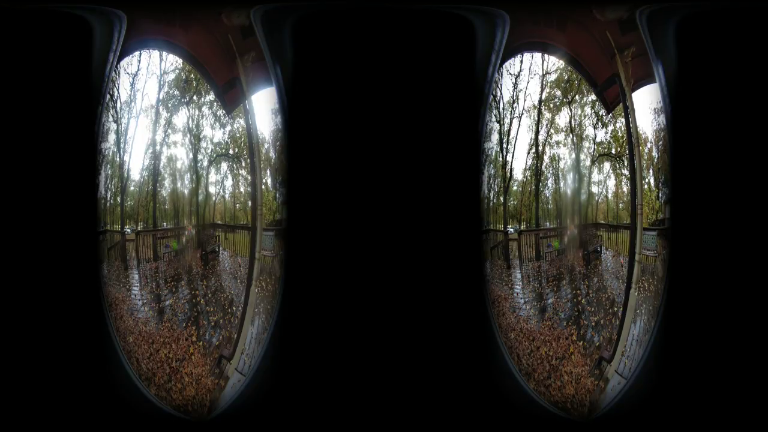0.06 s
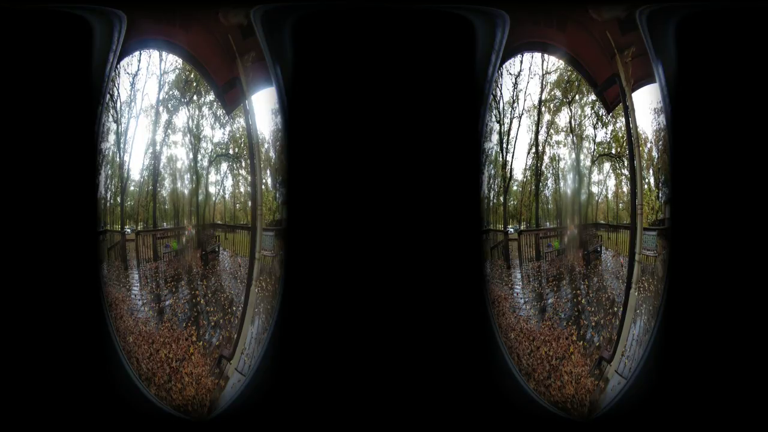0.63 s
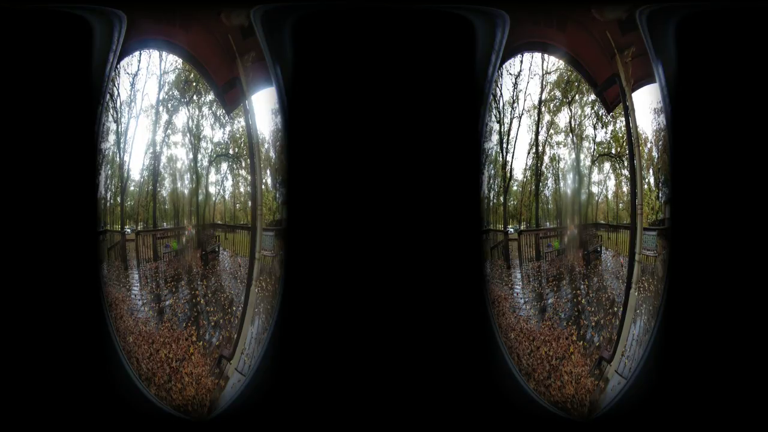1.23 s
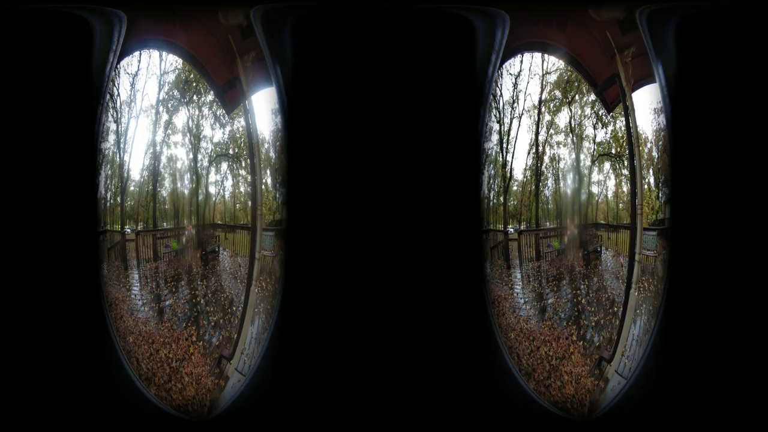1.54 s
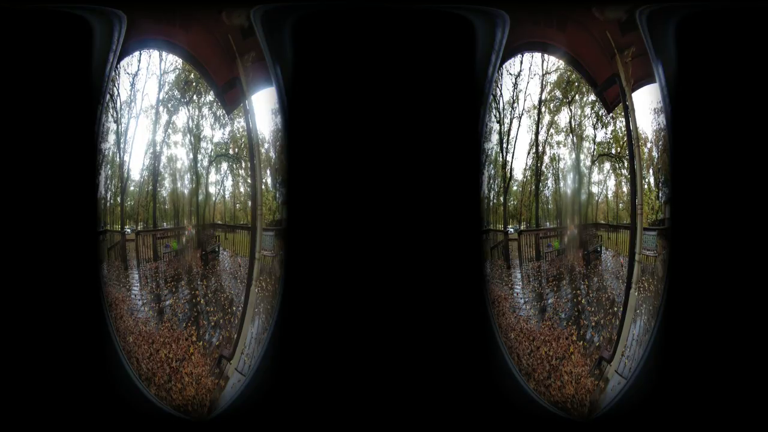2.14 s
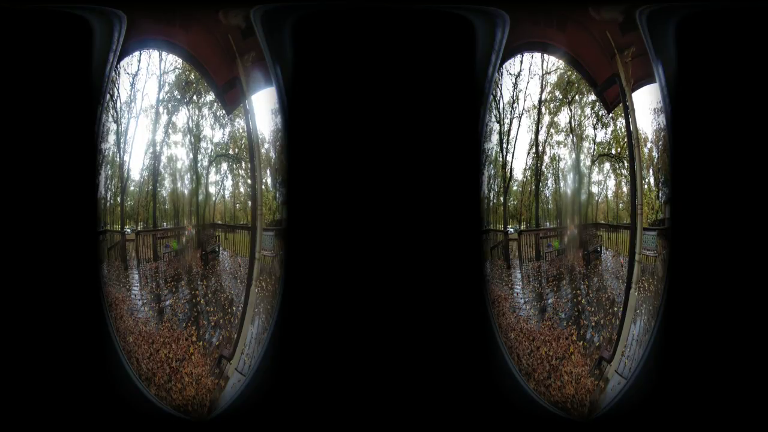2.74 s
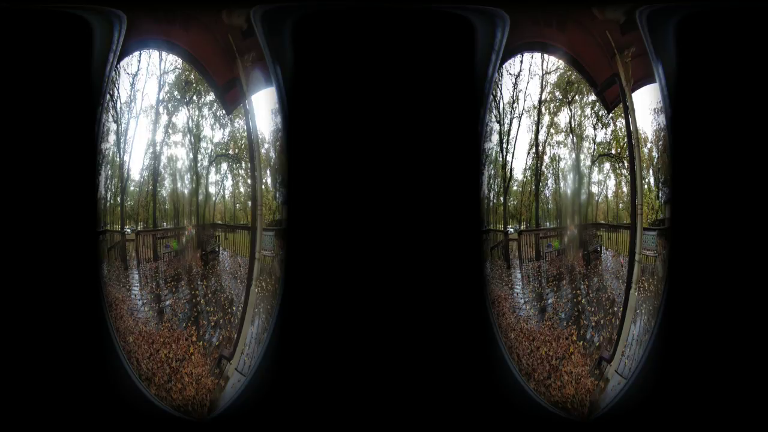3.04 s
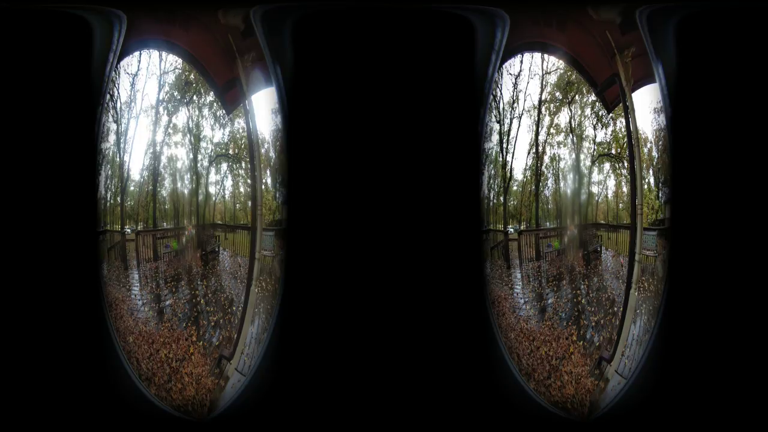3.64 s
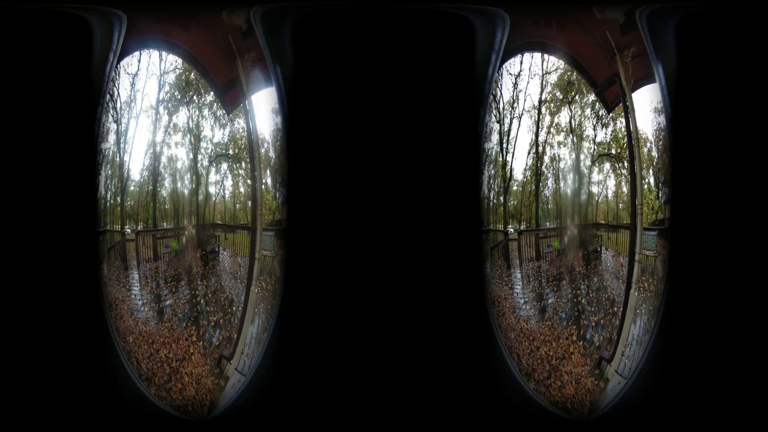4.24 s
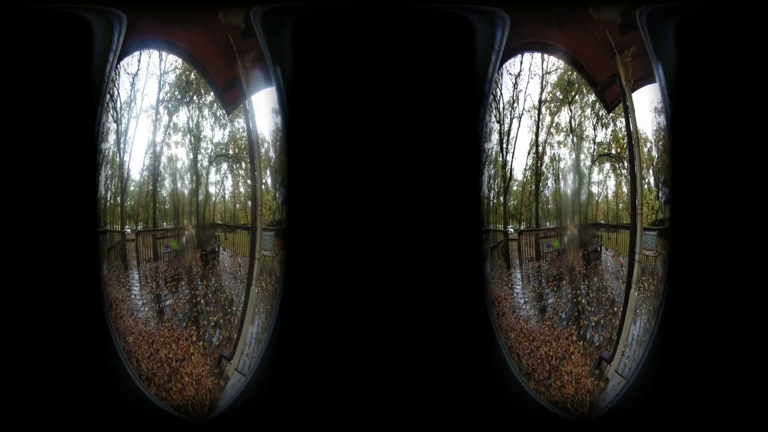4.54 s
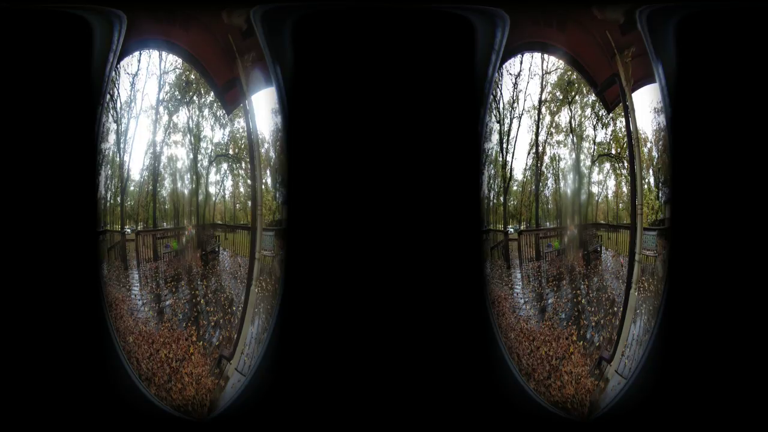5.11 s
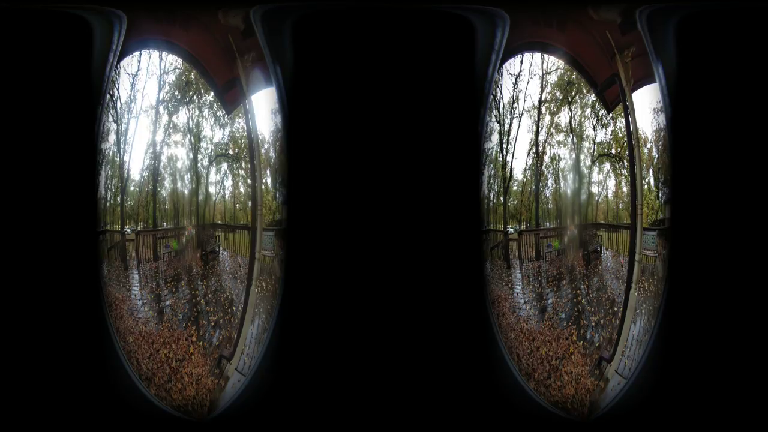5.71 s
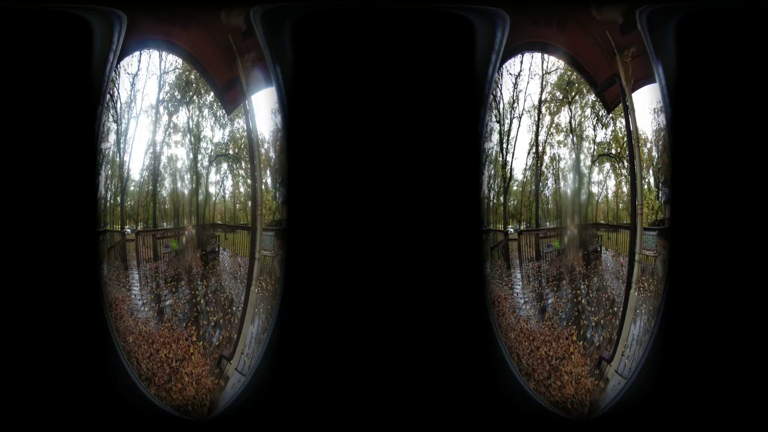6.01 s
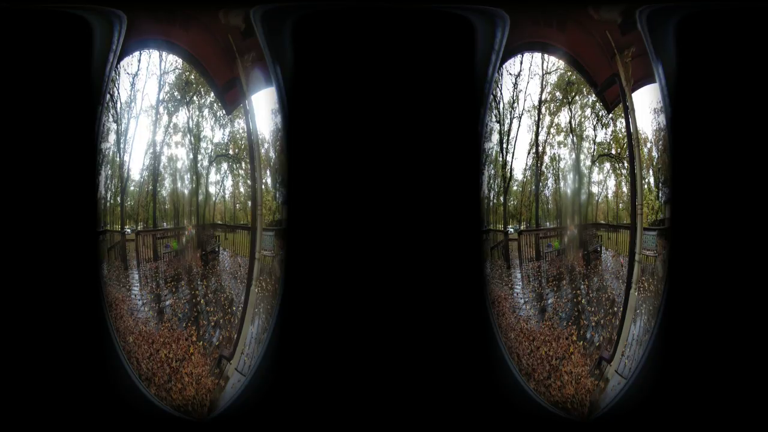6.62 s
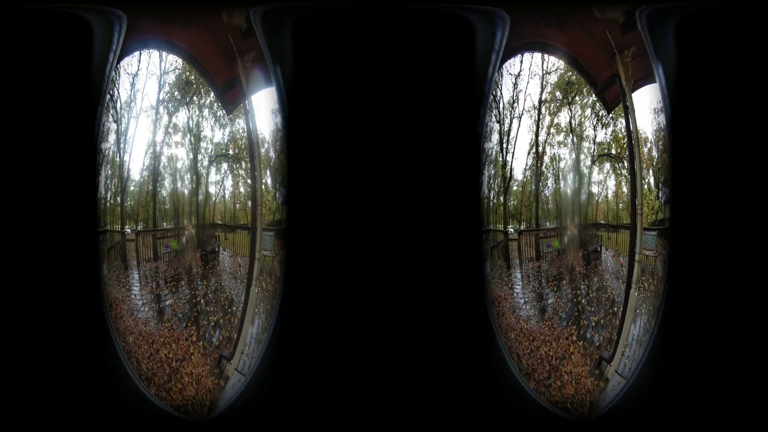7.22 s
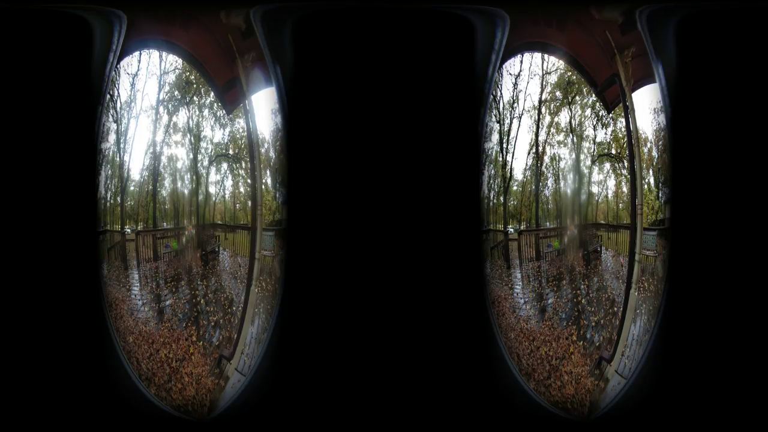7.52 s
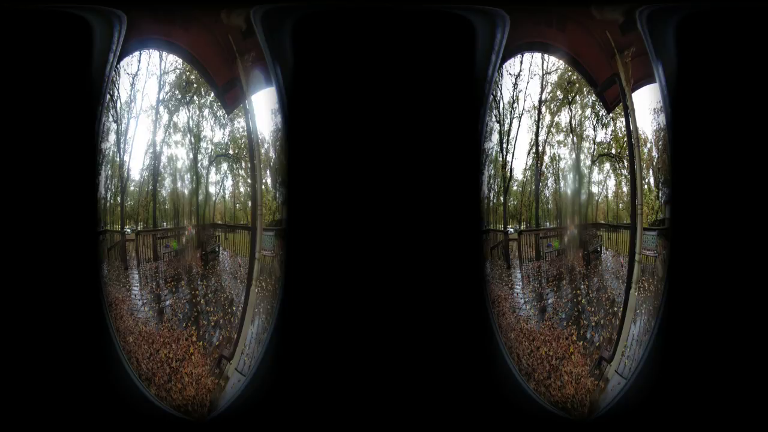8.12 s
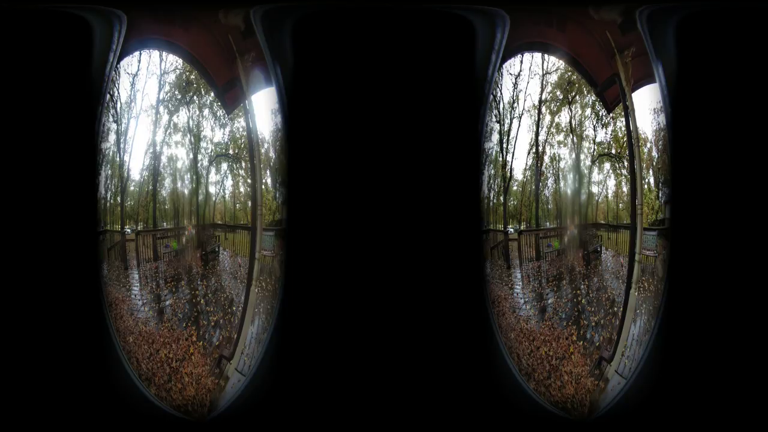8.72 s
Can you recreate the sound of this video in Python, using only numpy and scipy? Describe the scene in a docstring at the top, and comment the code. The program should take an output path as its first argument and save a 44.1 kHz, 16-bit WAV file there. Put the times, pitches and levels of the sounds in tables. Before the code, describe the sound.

Rain patters on leaves and splats on a porch deck, with wind buffeting the microphone and drops knocking on a metal roof, then fading.

```python
"""Rain in front of a porch. From the start it hisses and patters on wet leaves, gusts buffet the two
microphone ports in turn, bubbles plop in puddles and fat drops from the eaves splat on the deck.
From 1.2 s drops ring the sheet roof overhead; near 5.6 s a run of water drums on it.
Soft splashes enter at 6 s. From 7 s the rain and wind sink away, leaving a few faint splashes."""
import sys
import numpy as np
from scipy import signal
from scipy.fft import rfft, irfft, next_fast_len
from scipy.io import wavfile
from scipy.ndimage import uniform_filter1d, map_coordinates

SR = 44100
rng = np.random.default_rng(int(sys.argv[2]) if len(sys.argv) > 2 else 0)


def digitize_waveform(pressure):
    """Quantize a signal to 16-bit integers and store it at the path in sys.argv[1].

    Rows of a 2-D input are taken as channels; values are limited to [-1, 1].
    """
    field = np.atleast_2d(pressure).T
    bounded = np.clip(field, -1, 1)
    quanta = np.round(bounded * 32767).astype(np.int16)
    wavfile.write(sys.argv[1], SR, quanta)


N = 386316

# breeze between gusts: time_s, level_db
BREEZE = [(0.0, -44.5), (0.75, -40.5), (1.08, -51), (1.35, -41), (1.92, -54.5), (2.25, -38), (2.5, -54.5),
          (2.72, -43.5), (3.25, -40.5), (3.75, -53.5), (4.9, -53), (5.5, -62.5), (6.0, -63.5), (6.8, -62),
          (7.25, -74.5), (7.9, -76.5), (8.75, -79.5)]
# weak wind at a port: freq_hz, density_db
RUMBLE_SPECTRUM = [(20, -37), (36, -43), (60, -9), (90, 3.5), (125, -1), (175, -19), (260, -56.5),
                   (450, -97)]
# strong wind at a port: freq_hz, density_db
BUFFET_SPECTRUM = [(40, -40.5), (90, -7), (150, 6.5), (250, 1.5), (400, -9.5), (600, -24), (1000, -46),
                   (2500, -71)]
# shower strength: time_s, hiss_db, patter_db
SHOWER = [(0.0, -51.5, -62), (0.4, -49, -53.5), (1.25, -50.5, -55), (1.42, -49, -67), (1.7, -50, -68),
          (1.85, -50.5, -50.5), (2.3, -49, -63), (2.5, -48, -45.5), (3.0, -48.5, -49), (3.55, -48.5, -52),
          (3.93, -50.5, -57), (4.1, -48, -50), (4.5, -49, -60), (4.72, -48, -48.5), (5.45, -48, -45),
          (5.74, -56.5, -70), (6.1, -53, -61), (6.3, -48.5, -58), (6.85, -50, -53.5), (7.08, -58, -88),
          (7.48, -52, -77), (7.63, -58, -61), (7.71, -87.5, -100), (8.76, -99, -102)]
# far rain: freq_hz, density_db
HISS_SPECTRUM = [(500, -56), (1000, -13.5), (1450, 0), (2200, 1), (3300, 0.5), (5000, -1.5), (8000, -4.5),
                 (12500, -3), (16000, -4)]
# rain on leaves: freq_hz, density_db
PATTER_SPECTRUM = [(250, -37), (450, -18), (750, -17.5), (1100, -1), (1600, -2), (2300, -6.5), (3500, -5),
                   (7000, -27.5)]
# water spray: freq_hz, density_db
SPRAY_SPECTRUM = [(400, -49.5), (1000, -10.5), (2500, 0), (6000, 1.5), (9000, 1.5), (13000, 6), (16000, 1)]
# left-right likeness of sound from all round: freq_hz, coherence
COHERENCE = [(300, 0.88), (1400, 0.57), (3000, 0.032), (6000, 0.024)]
# still background: freq_hz, density_db
HUSH_SPECTRUM = [(100, -3), (400, -6), (1000, -11), (4000, -19.5), (16000, -25.5)]
# gusts: peak_s, level_db, left_minus_right_db, width_s, pitch_hz
GUSTS = [(0.013, -36, -14, 0.0042, 134), (0.135, -34.5, -7, 0.0048, 138.8),
         (0.325, -21.5, -20.5, 0.012, 215.6), (0.354, -21.5, -16.5, 0.019, 162),
         (0.439, -30.5, -3.5, 0.018, 171), (0.48, -30, -2, 0.011, 172.3), (0.543, -21, -12, 0.0041, 192),
         (0.585, -22, -19, 0.024, 176.6), (0.642, -24.5, -12, 0.016, 207), (0.707, -34.5, 16, 0.02, 176),
         (0.791, -32, -12, 0.012, 128), (1.138, -41.5, 9, 0.0066, 119), (1.253, -28.5, 13, 0.004, 154),
         (1.417, -33, 3, 0.015, 131), (1.478, -41.5, -1, 0.059, 140), (1.871, -41.5, 9, 0.0033, 135),
         (2.045, -27, 1, 0.012, 123), (2.071, -29, -10, 0.017, 120), (2.12, -29.5, 18, 0.0068, 142),
         (2.184, -27.5, 17, 0.0097, 155), (2.717, -34, 9.5, 0.039, 110), (2.871, -27.5, -10, 0.0047, 150),
         (2.881, -27, 7, 0.011, 180), (2.934, -26, 19, 0.023, 146), (3.022, -43.5, 2, 0.014, 151),
         (3.126, -35, -3.5, 0.012, 131), (3.379, -24.5, 13, .012, 146), (3.406, -22.5, 18, 0.011, 148),
         (4.331, -44, 2.5, 0.08, 69.6), (5.808, -46.5, 5, 0.041, 80.5), (6.163, -50.5, 3.5, 0.047, 71),
         (6.528, -46.5, 10.5, 0.015, 87.4), (6.661, -42, 6.5, 0.029, 134), (6.847, -53.5, -3, 0.019, 79.2),
         (7.449, -58, -2, 0.044, 74)]
# swirls of a gust: pitch_ratio, density_db
SWIRL_SPECTRUM = [(.25, -45.5), (.58, 2.5), (1, 1.5), (1.5, -4.5), (2.4, -13.5), (3.6, -26.5), (5, -47.5),
                  (8, -61.5)]
# bubbles in puddles: start_s, peak_db, pitch_hz
PLOPS = [(0.02, -49, 554), (0.825, -53.5, 678), (0.945, -56, 996), (0.975, -47, 582), (1.615, -50.5, 627),
         (1.89, -52, 713), (1.93, -56, 928), (2.38, -53, 425), (2.77, -48.5, 1200), (3.075, -52, 710),
         (3.975, -53, 525), (4.012, -52.5, 438), (4.63, -46, 333), (5.08, -50, 677), (5.83, -54.5, 920),
         (6.305, -55.5, 702), (7.16, -57, 753)]
# fat drops on the deck: start_s, level_db, pitch_hz, spray_db
DECK_DROPS = [(0.2003, -32, 7990, 1), (0.3818, -17.5, 3230, -33), (0.4409, -29.5, 3500, -19),
              (0.4743, -29.5, 4000, -22), (0.8129, -25, 1530, -21), (1.9819, -35.5, 2510, -5.5),
              (2.1086, -41, 5000, -3), (2.4287, -22, 1470, -28), (2.4568, -26.5, 3500, -17),
              (2.7943, -29, 1167, -5), (3.048, -23.5, 1690, -10.5), (3.2011, -39, 5000, -0.5),
              (3.3106, -22, 1120, -23.5), (3.455, -24, 1270, -15.5), (3.556, -28.5, 6300, -8.5),
              (3.8664, -18.5, 3000, -24), (4.069, -22, 2150, -19), (4.1604, -21.5, 1390, -12.5),
              (4.1849, -33.5, 2000, -3), (4.603, -18.5, 2950, -31), (4.697, -18, 1600, -27),
              (4.828, -38, 1390, 1), (4.8696, -40, 6000, 4), (4.904, -26.5, 3000, -14),
              (4.9139, -28, 1990, -5.5), (4.987, -19.5, 1610, -18), (4.996, -15, 1170, -18),
              (5.0443, -22, 2940, -18), (5.0834, -21.5, 3180, -11.5), (5.09, -20.5, 2500, -30),
              (5.1354, -23, 1250, -32), (5.1664, -24, 2400, -8.5), (5.2115, -29.5, 1850, -1),
              (5.2162, -19, 1850, -14.5), (5.357, -25.5, 3070, -16), (5.407, -28, 3740, -11),
              (5.4454, -20, 2430, -21), (5.4586, -23.5, 3900, -11), (5.5356, -26.5, 2670, -21),
              (5.9298, -27.5, 960, -13), (6.121, -31, 1556, -12), (6.2337, -23, 2030, -17.5),
              (6.2698, -16.5, 3440, -20), (6.3605, -24.5, 1790, -16), (6.4086, -18.5, 1920, -25),
              (6.569, -30, 2200, -12), (6.5788, -18.5, 1720, -19), (6.6087, -20, 2460, -18.5),
              (6.6205, -13, 5830, -21), (6.636, -20, 3240, -18), (6.7086, -26, 1450, -14),
              (6.7558, -31.5, 2980, -7.5), (6.8283, -24, 1390, -17), (6.861, -20.5, 1880, -25.5),
              (7.0689, -40, 4000, -2), (7.3015, -26.5, 4920, -16), (7.4465, -27.5, 1570, -9),
              (7.9158, -45.5, 1600, 1)]
# drops on the roof: start_s, level_db, pitch_hz, ring_s
ROOF_KNOCKS = [(1.172, -38, 850, 0.96), (1.787, -31.5, 630, 0.46), (2.577, -21.5, 562, 0.43),
               (2.69, -27.5, 560, 0.43), (3.31, -28.5, 1030, 0.2), (3.612, -23.5, 292, 0.49),
               (3.613, -27.5, 696, 0.89), (3.742, -32.5, 463, 0.39), (4.578, -36, 515, 0.42),
               (4.749, -38.5, 354, 0.22), (4.895, -32, 365, 0.36), (5.109, -41.5, 490, 0.56),
               (5.443, -30.5, 780, 0.35), (6.28, -39.5, 440, 0.34), (6.335, -40, 365, 0.22),
               (6.633, -38, 304, 0.37), (6.696, -36, 780, 0.43), (6.809, -39, 412, 0.34),
               (7.44, -40.5, 372, 0.3), (7.571, -44.5, 507, 0.24)]
# roof sheet modes: freq_hz, level_db, t60_over_ring
SHEET_MODES = [(252, -28, 0.94), (300.5, -2, .8), (339, -6, 0.91), (389.2, -3, .7), (452, -2, 0.74),
               (504, -10, 0.37), (624, -7, 0.56), (688, -8.5, .55), (780, -11, .44), (930, -4.5, 0.35),
               (985, -3.5, .5), (1130, -17.5, 0.45), (1400, -10.5, .4)]
# water running onto the roof: time_s, level_db
RUNOFF = [(5.53, -120), (5.565, -54), (5.66, -49), (5.80, -49.5), (5.87, -52.5), (5.93, -66), (6.05, -100)]
# drumming roof: freq_hz, density_db
DRUM_SPECTRUM = [(100, -40.5), (210, -4.5), (290, 4), (360, 8), (470, -8.5), (650, -52)]
# late splashes: start_s, hollow_db, mist_db, length_s, mist_hz
SPLASHES = [(5.983, -52, -55, 0.057, 6000), (6.117, -57, -55, 0.06, 12000), (6.9, -54, -67, 0.09, 6040),
            (7.07, -65, -52, 0.019, 6570), (7.157, -66, -50.5, 0.079, 6450), (7.256, -60, -53, 0.049, 7000),
            (7.39, -56.5, -73, 0.096, 6960), (7.548, -57, -59, 0.051, 6950), (7.738, -76, -67, 0.13, 7100),
            (7.842, -54.5, -68, 0.059, 12000), (7.909, -59, -55, 0.083, 7600),
            (8.002, -66, -54, 0.056, 12000), (8.197, -93.5, -64.5, 0.07, 7500),
            (8.307, -61.5, -72.5, 0.052, 5680), (8.514, -68, -69, 0.048, 4160),
            (8.609, -83.5, -77, 0.056, 6900)]
# hollow a splash opens in the water: freq_hz, q, level_db
HOLLOW_MODES = [(1560, 2.9, 0), (2480, 4.8, -7), (5540, 8, -17.5)]


def amp(db):
    """Decibels to gain."""
    return 10 ** (np.asarray(db) / 20)


def unit(x):
    """Scale to rms 1."""
    return x / np.sqrt(np.mean(x ** 2) + 1e-20)


def along(points, hz):
    """Read (freq_hz, value) points on a log axis."""
    freq_hz, values = np.transpose(points)
    return np.interp(np.log(hz + 1), np.log(freq_hz), values)


def curves(rows):
    """Per-sample curve for each column after time_s."""
    time_s, *columns = np.transpose(rows)
    return [np.interp(np.arange(N) / SR, time_s, column) for column in columns]


def wobble(rate_hz, size=N):
    """Smooth random curve with knots at rate_hz."""
    knots = rng.standard_normal(int(size * rate_hz / SR) + 4)
    return map_coordinates(knots, [np.arange(size) * rate_hz / SR])


def filtered(x, response):
    """Apply a frequency response."""
    n = x.shape[-1]
    padded = next_fast_len(n + 2048, True)
    return irfft(rfft(x, padded) * response(np.fft.rfftfreq(padded, 1 / SR)), padded)[..., :n]


def resonance(hz, centre_hz, q):
    """Causal response of one damped mode."""
    damping = 1j * hz * centre_hz / q
    return damping / (centre_hz ** 2 - hz ** 2 + damping)


def stereo(pair, spectrum):
    """Colour and blend two unrelated signals: alike in the bass, apart in the treble."""
    def response(hz):
        angle = np.arccos(np.clip(along(COHERENCE, hz), 0, 1)) / 2
        return amp(along(spectrum, hz)) * [np.cos(angle), np.sin(angle)]
    mid, side = filtered(pair, response)
    return np.array([mid + side, mid - side])


def add(track, start_s, sound):
    """Mix sound into track."""
    part = track[:, max(round(start_s * SR), 0):][:, :sound.shape[-1]]
    part += sound[..., :part.shape[-1]]


def patchy(x, depth_db, frame):
    """Shifting spots of colour with deep dips and blunt peaks."""
    spectra = signal.stft(x, nperseg=frame)[2]
    field = rng.standard_normal(spectra.shape[1:])
    field = uniform_filter1d(uniform_filter1d(field, 3, axis=0), 3, axis=1)
    gain = amp(depth_db * np.minimum(unit(field), 1.4))
    return signal.istft(spectra * gain, nperseg=frame)[1][:, :x.shape[-1]]


def ports(pan_db):
    """Left and right gains at constant total power."""
    gain = amp([[pan_db / 2], [-pan_db / 2]])
    return gain / np.sqrt(np.mean(gain ** 2))


def eddies(spectrum, size=N):
    """Turbulence of evened-out strength, unrelated at the two ports."""
    swirl = filtered(rng.standard_normal((2, size)), lambda hz: amp(along(spectrum, hz)))
    power = np.abs(uniform_filter1d(uniform_filter1d(swirl ** 2, 1400), 900)) + 1e-12
    return unit(swirl / np.sqrt(power))


def breeze(knee_db=-38.5, knee_width_db=3):
    """Wind at the ports: rumble below the knee, buffeting above; weaker flow flutters more."""
    level_db, = curves(BREEZE)
    depth_db = 3.5 + 0.0289 * (knee_db - level_db)
    flutter_db = depth_db * np.array([wobble(rate_hz=26), wobble(rate_hz=26)])
    flow = amp(level_db + flutter_db) * ports(pan_db=2.0)
    buffet_share = 1 / (1.5 + np.exp((knee_db - 20 * np.log10(flow)) / knee_width_db))
    rumble = np.sqrt(1 - buffet_share) * eddies(RUMBLE_SPECTRUM)
    buffet = np.sqrt(buffet_share) * eddies(BUFFET_SPECTRUM)
    return flow * (rumble + buffet)


def grains(rate_hz, spread_db, decay_s):
    """Droplet crackle: tiny noise bursts of random time, size and pan."""
    moment, weight, pan = rng.random((int(rate_hz * N / SR), 3)).T
    size = amp(spread_db * np.minimum(-np.log(1 - weight), 4))
    at = (moment * N).astype(int)
    power = np.array([np.bincount(at, size ** 2 * share, N) for share in (pan + .5, 1.5 - pan)])
    power = signal.lfilter([1], [1, -np.exp(-2 / (decay_s * SR))], power)
    return unit(np.sqrt(power) * rng.standard_normal((2, N)))


def leaf_taps(rate_hz, centre_hz, decay_cycles, spread_db):
    """Drops on wet leaves: dull ticks of random pitch and place, as mid and side."""
    moment, pitch, weight, pan = rng.random((int(rate_hz * N / SR), 4, 1)).swapaxes(0, 1)
    t = np.arange(400) / SR
    hz = centre_hz * 2 ** (3 * (pitch - .5))
    size = amp(spread_db * np.minimum(-np.log(1 - weight), 3.5))
    tick = size * np.exp(-t * hz / decay_cycles) * (1 - t / t[-1]) * np.sin(2 * np.pi * hz * t)
    at = (moment * N).astype(int) + np.arange(len(t))
    mid_side = [np.bincount(at.ravel(), (tick * gain).ravel(), N)[:N] for gain in (1, 2 * pan - 1)]
    return unit(np.array(mid_side))


def shower(full_db=-48.5):
    """Small drops hiss in the trees, patter on leaves and tick on boards; thin rain flickers."""
    hiss_db, patter_db = curves(SHOWER)
    fine = grains(rate_hz=600, spread_db=1.5, decay_s=0.00016)
    fine += amp(4.0) * rng.standard_normal((2, N))
    coarse = leaf_taps(rate_hz=390, centre_hz=1584, decay_cycles=1.4, spread_db=2.5)
    coarse += amp(4.5) * rng.standard_normal((2, N))
    hiss = unit(patchy(stereo(fine, HISS_SPECTRUM), depth_db=4.5, frame=1024))
    ticks = unit(stereo(grains(rate_hz=70, spread_db=7.5, decay_s=0.0005), SPRAY_SPECTRUM))
    patter = unit(patchy(stereo(coarse, PATTER_SPECTRUM), depth_db=6.0, frame=1024))
    flicker = amp(0.6949 * np.clip(full_db - hiss_db, 0, 8) * wobble(rate_hz=22))
    return flicker * (amp(hiss_db + 2.5) * (hiss + amp(-17.0) * ticks) + amp(patter_db - 5.5) * patter)


def hush(level_db=-92.5):
    """Faint steady background."""
    return amp(level_db) * unit(stereo(rng.standard_normal((2, N)), HUSH_SPECTRUM))


def gusts(eddy_cycles=0.72, port_cutoff_hz=55):
    """Each gust thumps the ports with one sharp eddy amid lumpy swirls; the ports cut the deep bass."""
    out = np.zeros((2, N + SR))  # 1 s of lead-in
    t = np.arange(SR // 2) / SR - .25
    for peak_s, level_db, pan_db, width_s, pitch_hz in GUSTS:
        swell = (1 + (t / max(1.7 * width_s, .008)) ** 2) ** -1.8
        lumps = amp(0.5 * wobble(rate_hz=59.7, size=len(t)))
        swirls = eddies([(pitch_hz * ratio, db) for ratio, db in SWIRL_SPECTRUM], len(t))
        churn = np.array([unit(port) for port in swell * lumps * swirls]) * np.sqrt(np.mean(swell ** 2))
        eddy = np.cos(2 * np.pi * (pitch_hz * t + rng.random((2, 1))))
        eddy /= (1 + (t * pitch_hz / eddy_cycles) ** 2) ** 2
        add(out, 1 + peak_s + t[0], amp(level_db) * ports(pan_db) * (amp(-1) * churn + amp(4) * eddy))
    return filtered(out[:, SR:], lambda hz: 1 - 1 / (1 + (hz / port_cutoff_hz) ** 8))


def strays(rate_hz, over_db, centre_hz, scatter_db=4.5):
    """Random lesser drops that follow the shower's level: start_s, level_db, pitch_hz."""
    shower_db = np.mean(curves(SHOWER), axis=0)
    rows = []
    for moment, size, pitch in rng.random((int(rate_hz * N / SR), 3)):
        level_db = shower_db[int(moment * N)] + over_db + scatter_db * (2 * size - 1)
        rows.append((moment * N / SR, level_db, centre_hz * 2 ** (1.6 * (pitch - .5))))
    return rows


def plops(rise_s=0.0054, t60_s=0.14, climb_oct_per_s=.7, waver_rad=0.76):
    """Each drop traps a bubble in a puddle; it rings briefly, climbing slightly in pitch."""
    out, t = np.zeros((2, N)), np.arange(SR // 5) / SR
    envelope = (1 - np.exp(-t / rise_s)) * amp(-60 * t / t60_s)
    for start_s, peak_db, pitch_hz in list(PLOPS) + strays(rate_hz=26, over_db=-5.5, centre_hz=1150):
        glide_hz = pitch_hz * 2 ** (climb_oct_per_s * (t - rise_s))
        phase = 2 * np.pi * np.cumsum(glide_hz) / SR + waver_rad * wobble(rate_hz=110, size=len(t))
        add(out, start_s, amp(peak_db) * envelope / envelope.max() * np.sin(phase))
    return out


def deck_drops(lead_s=.006, wall_delay_s=.0062, max_rebound_s=0.0058, stray_spray_db=-17.5):
    """A sharp hollow slap with spray, a rebounding droplet and an echo off the porch wall."""
    out, t = np.zeros((2, N)), np.arange(SR // 12) / SR - lead_s
    burst = lambda age_s, t60_s: (age_s >= 0) * amp(-60 * np.abs(age_s) / t60_s)
    impact = burst(t, .0028) + .06 * burst(t, .025) + .03 * burst(t, .14)
    echo = 0.38 * burst(t - wall_delay_s, .005)
    lesser = [(*row, stray_spray_db) for row in strays(rate_hz=13, over_db=14.5, centre_hz=2190)]
    for start_s, level_db, pitch_hz, spray_db in list(DECK_DROPS) + lesser:
        delay, size = rng.random(2)
        rebound = 0.34 * size * burst(t - max_rebound_s * delay, .005)
        splat = stereo((impact + echo + rebound) * rng.standard_normal((2, len(t))), SPRAY_SPECTRUM)
        wet_body = stereo(burst(t, 0.068) * rng.standard_normal((2, len(t))), SPRAY_SPECTRUM)
        slap = unit(filtered(splat + .15 * wet_body, lambda hz: resonance(hz, pitch_hz, q=3.5)))
        spray = unit(patchy(splat, depth_db=6.0, frame=128))
        add(out, start_s + .0005 - lead_s, amp(level_db - 28.0) * (slap + amp(spray_db + 15.0) * spray))
    return out


def roof_knocks(sag_s=.55, rise_s=0.00067):
    """Each drop smacks the sheet and rings the modes near one pitch; a rattle darkens as it dies."""
    out, t = np.zeros((2, N)), np.arange(SR // 3) / SR
    mode_hz, mode_db, t60_over_ring = np.transpose(SHEET_MODES)[:, :, None]
    slowing_s = sag_s * (1 - np.exp(-t / sag_s))
    for start_s, level_db, pitch_hz, ring_s in ROOF_KNOCKS:
        scatter, detune, offset = rng.standard_normal((3, len(SHEET_MODES), 1))
        gain = amp(mode_db + 2 * scatter - 25 * np.abs(np.log2(mode_hz / pitch_hz)))
        phase = 2 * np.pi * mode_hz * (1 + 0.012 * detune) * t + np.pi * offset
        modes = np.sum(gain * amp(-60 * t / (ring_s * t60_over_ring)) * np.sin(phase), axis=0)
        rattle = rng.standard_normal(len(t))
        rattle = filtered(rattle, lambda hz: resonance(hz, pitch_hz * 1.03, q=3.3) ** 2)
        rattle = np.interp(slowing_s, t, rattle) * amp(-60 * t / (ring_s * 1.04))
        smack = rng.standard_normal(len(t)) * amp(-60 * t / 0.075)
        smack = filtered(smack, lambda hz: resonance(hz, 1400, q=1.2) ** 2)
        knock = unit(modes) + amp(-2.5) * unit(rattle) + amp(-7.5) * unit(smack)
        knock *= 1 - np.exp(-t / rise_s)
        add(out, start_s, amp(level_db - 5) * knock / np.abs(knock).max())
    return out


def runoff():
    """A quick string of drops merges into a dull roll on the roof."""
    level_db, = curves(RUNOFF)
    roll = grains(rate_hz=160, spread_db=-1.0, decay_s=0.019)
    return amp(level_db) * unit(stereo(roll, DRUM_SPECTRUM))


def splashes(rise_s=0.0044, bead_db=3.5):
    """Soft splashes: a hollow watery ring under a mist that breaks into droplets."""
    out, t = np.zeros((2, N)), np.arange(SR // 4) / SR
    hollow = lambda hz: sum(amp(db) * resonance(hz, mode_hz, q) ** 2 for mode_hz, q, db in HOLLOW_MODES)
    for start_s, hollow_db, mist_db, length_s, mist_hz in SPLASHES:
        envelope = (1 - np.exp(-t / rise_s)) * np.exp(-(t / length_s) ** 3)
        mist = lambda hz: resonance(hz, mist_hz, q=0.95) ** 2
        for level_db, colour, bead_rate_hz in ((hollow_db, hollow, 70), (mist_db, mist, 240)):
            spray = filtered(stereo(rng.standard_normal((2, len(t))), SPRAY_SPECTRUM), colour)
            spray = patchy(spray, depth_db=19, frame=1024)
            beads = amp(bead_db * wobble(bead_rate_hz, len(t)))
            splash = unit(envelope * spray * beads) * np.sqrt(np.mean(envelope ** 2))
            add(out, start_s, amp(level_db) * splash)
    return out


def scene():
    """Everything heard from the porch."""
    return (breeze() + gusts() + shower() + roof_knocks() + runoff()
            + plops() + splashes() + hush() + deck_drops())


def record(dry, cutoff_hz=15950):
    """Steep low-pass."""
    return filtered(dry, lambda hz: 1 / (1 + (hz / cutoff_hz) ** 200))


dry = scene()
out = record(dry)
digitize_waveform(out)
```